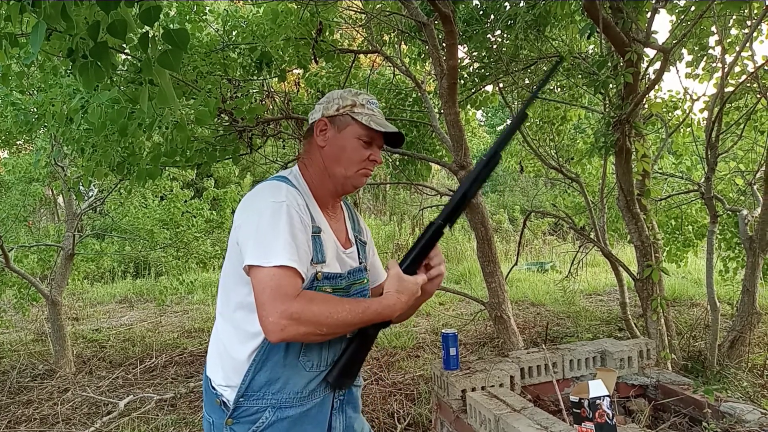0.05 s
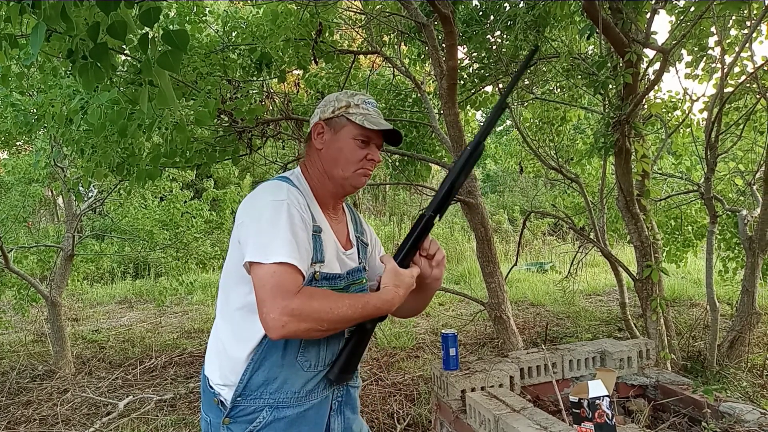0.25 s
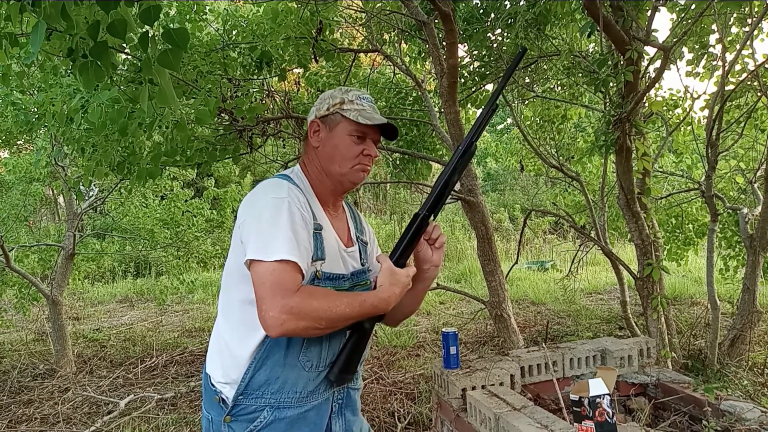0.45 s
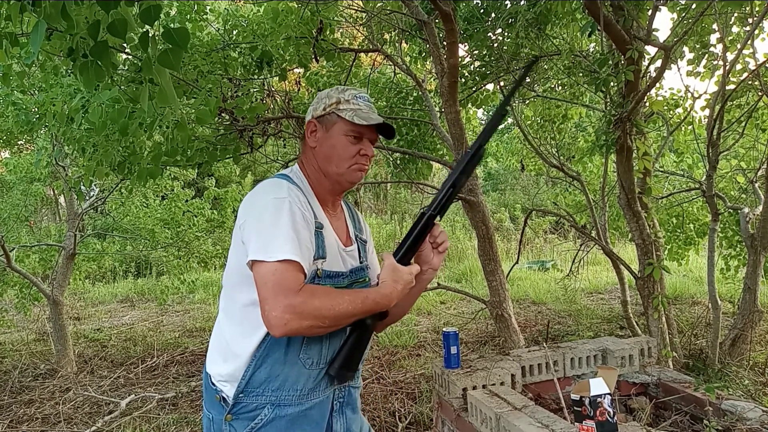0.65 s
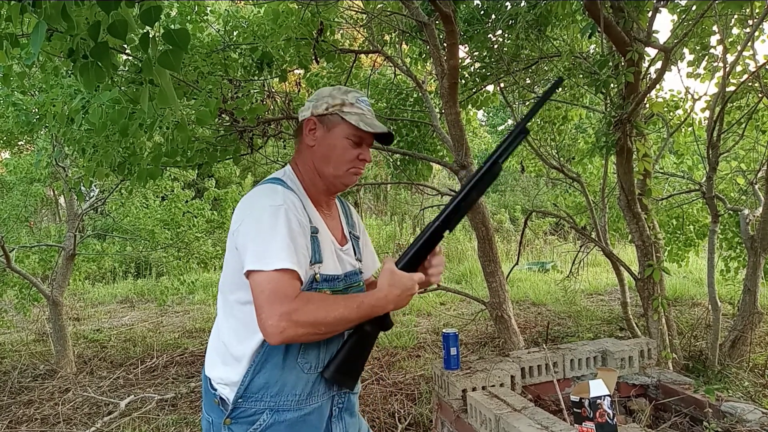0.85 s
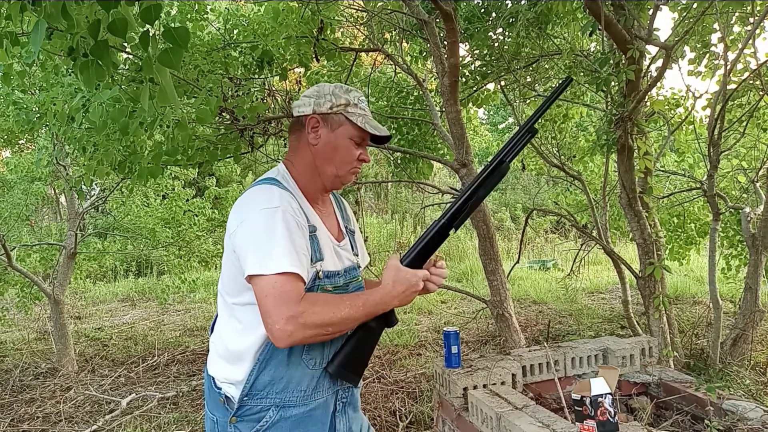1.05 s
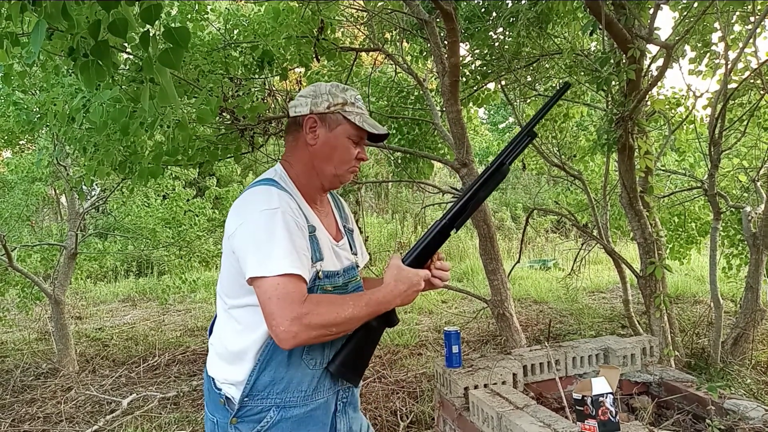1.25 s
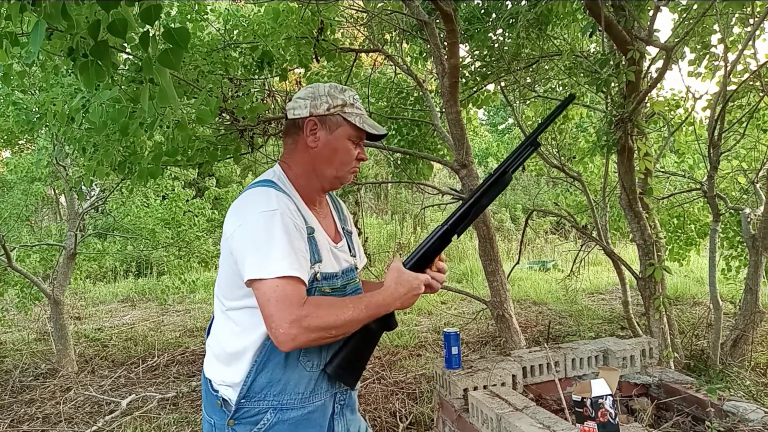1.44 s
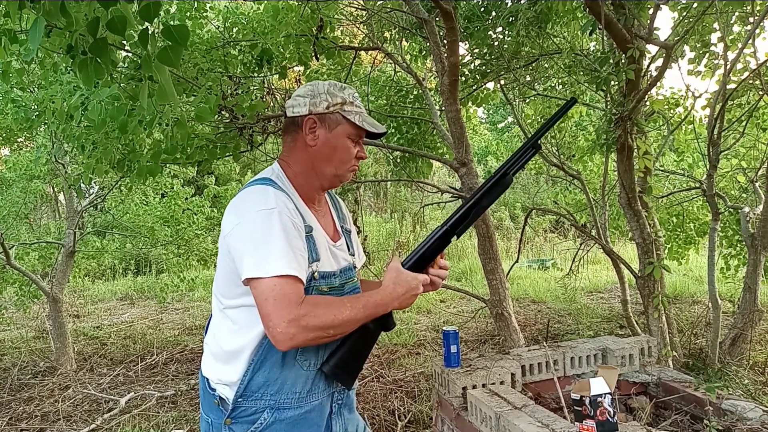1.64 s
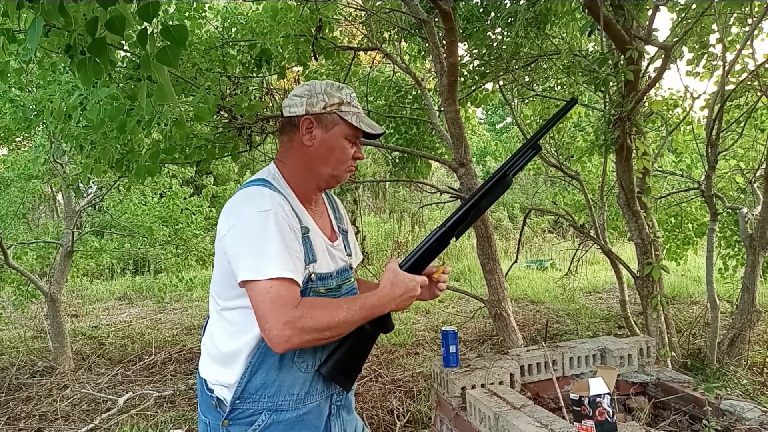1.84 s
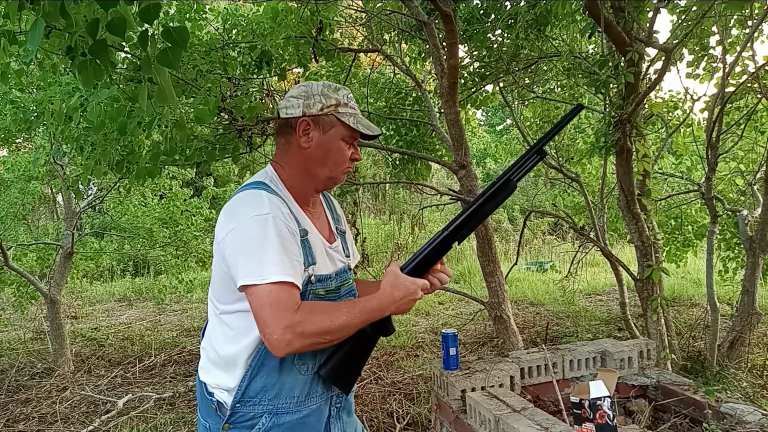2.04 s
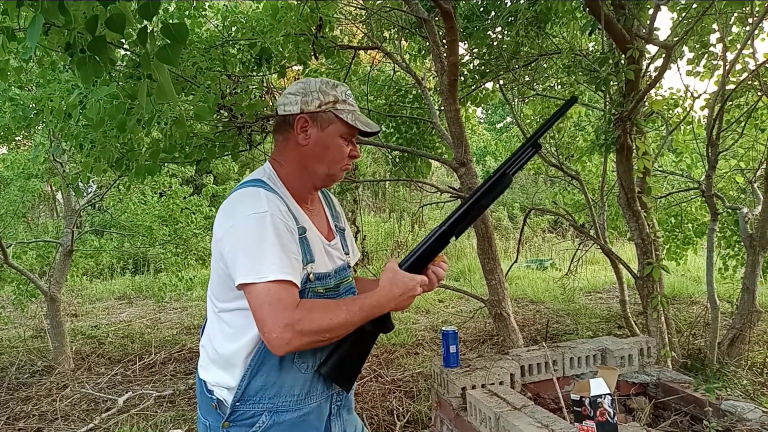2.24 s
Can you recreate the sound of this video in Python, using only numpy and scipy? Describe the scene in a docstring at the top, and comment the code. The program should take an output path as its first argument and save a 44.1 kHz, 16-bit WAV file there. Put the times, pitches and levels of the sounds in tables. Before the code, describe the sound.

A shotgun action is worked close by. The bolt scrapes back with quick metal clacks from about 0.2 to 0.4 seconds, then clacks shut at 0.6. A sharp snap comes at 1.1 seconds, a small click at 1.4 and another crisp click just after 1.5. Faint insects hiss steadily among the trees throughout, one of them chirping softly.

```python
"""Shotgun action among trees

The bolt scrapes back by stick-slip friction, hits its stop and clacks shut; each impact excites the
modes of receiver and stock. The trigger group snaps and a small catch clicks. Trunks and leaves scatter
each sound briefly. Insects hiss steadily and one chirps. The two microphones differ in frequency
response, and the gun's sound reaches the left one later."""
import sys
import numpy as np
from scipy import signal
from scipy.fft import rfft, irfft, next_fast_len
from scipy.io import wavfile
from scipy.ndimage import map_coordinates

SR = 44100
rng = np.random.default_rng(int(sys.argv[2]) if len(sys.argv) > 2 else 0)


def persist_wave(psi):
    """Save psi, clipped to +-1, as 16-bit WAV."""
    counts = np.round(np.clip(psi, -1, 1) * 32767).astype(np.int16)
    wavfile.write(sys.argv[1], SR, np.atleast_2d(counts).T)


N = 105840
T = np.arange(N) / SR
IMPACT_T = T[:SR // 4]

# Noise spectra of the air and two insect choruses: frequency_hz, density_db
AIR_SPECTRUM = [(25, -20.5), (45, -1), (58, 15.5), (80, 2), (118, 11), (160, 2), (400, -2.5), (1500, -3.5),
                (3500, -5), (6000, -7.5), (7200, -17.5), (10000, -12), (12000, -45)]
LOW_CHORUS = [(6500, -44.5), (7400, -15), (7900, 3), (8600, 3), (9000, -9.5), (10500, -20), (11000, -26.5),
              (12000, -58)]
HIGH_CHORUS = [(7500, -49.5), (8900, -20.5), (9300, 4.5), (9900, 2.5), (10500, -1), (10800, -14),
               (11400, -30.5), (13800, -52), (14800, -30), (15700, -37), (16300, -71.5)]
# Chirps of one insect: centre_s, level_db
CHIRPS = [(.11, -66.5), (.47, -64), (.95, -67.5), (1.109, -69.5), (1.27, -70.5), (1.43, -65),
          (1.625, -68.5), (1.762, -69), (1.925, -65), (2.09, -68.5), (2.261, -69)]
# Bolt impacts: start_s, level_db, crack_t60_s, tilt_db_per_octave, thump_db
BOLT_IMPACTS = [(.125, -46.5, 0.067, -3.5, -18), (.199, -53, 0.033, -2, 0), (0.2857, -23, 0.026, 0, -41),
                (0.3086, -24, 0.022, -11.5, -20.5), (0.3134, -15.5, 0.019, -5.5, -36),
                (0.3594, -15, .024, -1, -24), (0.557, -56, 0.018, -11, -11),
                (0.5855, -35.5, 0.08, 14.5, -52), (0.6005, -14, 0.043, 1, -16.5),
                (0.6354, -19, 0.037, 0, -36.5), (.679, -32.5, 0.025, 5, -35), (.86, -59, 0.25, 7.5, -25),
                (2.31, -53, .1, -6, -4.5)]
# Spectra of contact noise and rubbed steel: frequency_hz, density_db
BOLT_CRACK = [(100, -74.5), (250, -25.5), (400, -36.5), (620, -30), (950, -11), (1700, 4), (3100, -1.5),
              (4400, -4), (5400, 0.5), (7200, -6), (8500, -9.5), (10500, -4), (12500, -34.5),
              (14800, -15.5), (16300, -18.5)]
TRIGGER_CRACK = [(100, -54.5), (500, -36.5), (1000, -18), (1500, -8.5), (1900, -3), (3100, -1), (3900, -17),
                 (4600, -12.5), (5200, -1), (6400, -4), (7600, -13), (10000, -16.5), (13000, -41.5),
                 (15000, -29.5)]
FRICTION_SPECTRUM = [(60, -82), (170, -62), (400, -21.5), (600, -49), (850, -7), (1250, -30), (1700, 1.5),
                     (3100, -6), (4500, -16.5), (5400, 1), (7200, -15.5), (8500, 2.5), (10500, -7),
                     (13300, -25.5), (14800, 4.5), (15800, -3.5), (16500, -25)]
# Normal modes of the struck parts: pitch_hz, level_db, t60_s
RECEIVER_MODES = [(1030, -7, .09), (1600, -7, .05), (1950, -5, .05), (2900, 0, .05), (3620, 0, .06),
                  (4150, -7, .04), (4990, 0, .05), (5420, 3, .05), (5850, -6, .04), (6680, -5, .04),
                  (7170, -2, .05), (8100, -7, .04)]
STOCK_MODES = [(230, -0.5, 0.036), (345, -0.5, 0.055), (405.7, -1.5, 0.096)]
TRIGGER_MODES = [(1030, -26, .04), (1350, -23, .03), (1800, -12, .025), (2080, -8, .025), (2400, -6, .022),
                 (2760, -2, .025), (3060, 3, .024), (3330, -10, .025), (5030, -6, .025), (5350, -12, .022),
                 (5770, -7, .024), (6100, -12, .022), (6720, -19, .025), (8750, -30, .025)]
# Friction along the bolt's stroke: time_s, level_db
STROKE = [(.212, -51.5), (.223, -36), (.245, -21), (.265, -26), (.278, -20.5), (.298, -27.5), (.316, -17.5),
          (.326, -24.5), (.336, -11.5), (.344, -32), (.358, -73.5)]
# Resonances of the rubbed and rattled parts: centre_hz, bandwidth_hz, gain_db
RAIL_RESONANCES = [(1890, 130, -3), (3060, 110, 1), (3590, 90, -6), (5390, 120, 0), (5810, 90, -1),
                   (6050, 160, 0), (6640, 140, -1), (7210, 110, -2)]
CHATTER_RESONANCES = [(1560, 57, -4), (2080, 84, -11), (2506, 76, -1), (2990, 120, -1), (3453, 81, -7),
                      (5390, 190, -6), (6200, 157, -1), (7040, 130, 0.5)]
DRAG_RESONANCES = [(1000, 80, -8), (1350, 52, -9.5), (1820, 200, -10.5), (2200, 250, -1), (2890, 200, 2),
                   (5080, 200, -7), (5560, 200, -7)]
SPRING_RESONANCES = [(435, 58, -10), (998, 22, 1), (2170, 300, -7), (3530, 210, -4.5), (5100, 400, -5.5),
                     (6000, 500, -10), (7200, 130, -2.5)]
CATCH_RESONANCES = [(2367, 79, 8), (3200, 124, 5), (4090, 92, 8), (5810, 490, 4), (7000, 500, -35)]
# Light drags before a part moves: start_s, length_s, level_db
DRAGS = [(0.222, 0.03, -28), (0.5605, 0.041, -52.5), (1.506, 0.013, -53.5), (1.525, 0.013, -34.5),
         (1.54, 0.015, -42.5)]
# Hammer and trigger impacts: start_s, level_db, tilt_db_per_octave, crack_db, crack_t60_s
TRIGGER_IMPACTS = [(1.129, -14, -0.5, -13.5, .018), (1.1318, -25, -8.5, -7.5, .025),
                   (1.156, -43, -10, -15, .03), (1.183, -49.5, 0, -13, .03), (1.2207, -54, 2, -3.5, .03),
                   (1.5213, -39.5, 4, -30, 0.027), (1.548, -44.5, 6, 2.5, .03),
                   (1.5549, -21, 5.5, -5.5, 0.032)]
# Contacts of the catch: start_s, level_db, t60_s
CATCH_CONTACTS = [(1.41, -31, 0.048), (1.424, -41, 0.096), (1.441, -47.5, .05)]
# Reverberation among the trees: frequency_hz, t60_s
TREE_DECAY = [(200, .2), (1000, 0.25), (3000, 0.2), (7000, 0.2), (12000, 0.19)]
# Reflections from single trunks: delay_s, level_db
TRUNK_ECHOES = [(0.029, -27.5), (.054, -44), (.093, -46.5)]
# Loss at the right microphone as the gun turns away: time_s, gain_db
TURN_AWAY = [(.3, -1.5), (.62, -3), (1.13, -2.5), (1.41, -7.5), (1.55, -9)]
# Microphone responses: frequency_hz, gain_db
LEFT_MIC = [(200, -10), (7500, 1.5), (8700, -3.5), (10000, -33), (12000, -27), (14800, -23.5),
            (16000, -29.5)]
RIGHT_MIC = [(200, -12.5), (1200, -11), (2800, -15.5), (5000, -15), (7000, -9.5), (8200, -17), (9500, -7.5),
             (15000, -10.5)]


def amp(db):
    """Decibels to amplitude ratio."""
    return 10 ** (np.asarray(db) / 20)


def unit(x):
    """Normalisation to rms 1."""
    return x / np.sqrt(np.mean(x ** 2) + 1e-20)


def onset_unit(x):
    """Normalisation to rms 1 over the first three milliseconds."""
    return x / np.sqrt(np.mean(x[:132] ** 2) + 1e-20)


def along(points, hz):
    """Interpolation on a logarithmic frequency axis."""
    point_hz, values = np.transpose(points)
    return np.interp(np.log(hz + 1), np.log(point_hz + 1), values)


def filtered(x, response):
    """Linear filtering: the spectrum is multiplied by a frequency response."""
    size = x.shape[-1]
    padded = next_fast_len(size + SR // 4)
    return irfft(rfft(x, padded) * response(np.fft.rfftfreq(padded, 1 / SR)), padded)[..., :size]


def coloured(x, points, tilt_db=0, size=4096):
    """Minimum-phase filtering to a given spectrum, tilted per octave between 800 and 8000 Hz."""
    hz = np.fft.rfftfreq(size, 1 / SR)
    octaves = np.log2(np.clip(hz, 800, 8000) / 4000)
    cepstrum = irfft(np.log(amp(along(points, hz) + tilt_db * octaves)))
    cepstrum[1:size // 2] *= 2
    cepstrum[size // 2 + 1:] = 0
    return signal.fftconvolve(x, irfft(np.exp(rfft(cepstrum))))[:len(x)]


def bandpass(x, low_hz, high_hz):
    """Causal third-order band-pass filtering."""
    return signal.sosfilt(signal.butter(3, [low_hz, high_hz], "band", fs=SR, output="sos"), x)


def resonate(x, peaks):
    """Forced response of damped resonators in parallel."""
    return filtered(x, lambda f: sum(amp(db) * 1j * f * width / (hz * hz - f * f + 1j * f * width)
                                     for hz, width, db in peaks))


def fade(t60):
    """Exponential decay of sixty decibels in t60 seconds."""
    return amp(-60 * IMPACT_T / t60)


def burst(t60):
    """Exponentially decaying white noise."""
    return rng.standard_normal(len(IMPACT_T)) * fade(t60)


def ring(modes, tilt_db=0, spread_db=3):
    """Free vibration: a sum of damped modes whose strengths vary from blow to blow."""
    vibration = 0
    for hz, db, t60 in modes:
        gain = amp(db + tilt_db * np.log2(hz / modes[0][0]) + spread_db * rng.normal())
        vibration += gain * fade(t60) * rng.choice([-1, 1]) * np.sin(2 * np.pi * hz * IMPACT_T)
    return onset_unit(vibration)


def add(track, start_s, sound):
    """Superposition of a sound on the track."""
    part = track[round(start_s * SR):][:len(sound)]
    part += sound[:len(part)]


def impulses(per_s):
    """A random point process: unit impulses of either sign."""
    return (rng.random(N) < per_s / SR) * rng.choice([-1, 1], N)


def slips(per_s=3500, spread_db=4.5):
    """Stick-slip friction: dense impulses of uneven size."""
    return impulses(per_s) * amp(spread_db * rng.standard_normal(N))


def hiss(spectrum, flutter_db=0, flutter_per_s=60):
    """Shaped noise with optional random amplitude modulation."""
    flutter = map_coordinates(rng.standard_normal(1000), [T * flutter_per_s], mode="mirror")
    return unit(coloured(rng.standard_normal(N), spectrum) * amp(flutter_db * flutter))


def woodland():
    """Incoherent sources add: air, a low chorus mainly left, a high one right and one chirping insect."""
    chirps = insect_chirps()
    left = amp(-64.5) * hiss(AIR_SPECTRUM) + chirps + amp(-67.5) * hiss(LOW_CHORUS, flutter_db=1)
    right = coloured(amp(-62.5) * hiss(AIR_SPECTRUM) + chirps, RIGHT_MIC)
    right += amp(-60.5) * hiss(HIGH_CHORUS, flutter_db=1) + amp(-81.5) * hiss(LOW_CHORUS)
    return np.array([left, right])


def insect_chirps(pitch_hz=4410, half_width_hz=150, sigma_s=.024):
    """Amplitude modulation: bell-shaped pulses of narrow-band noise make an insect's soft chirps."""
    carrier = filtered(rng.standard_normal(N), lambda f: np.exp(-((f - pitch_hz) / half_width_hz) ** 2))
    envelope = sum(amp(db) * np.exp(-((T - centre_s) / sigma_s) ** 2 / 2) for centre_s, db in CHIRPS)
    return unit(carrier) * envelope


def bolt_impacts(crack_db=-3, receiver_db=-5.5):
    """Impact excitation: each contact cracks, rings the steel receiver and thumps the stock."""
    out = np.zeros(N)
    for start_s, db, t60, tilt_db, thump_db in BOLT_IMPACTS:
        crack = amp(crack_db) * onset_unit(coloured(burst(t60), BOLT_CRACK, tilt_db))
        steel = amp(receiver_db) * bandpass(ring(RECEIVER_MODES, tilt_db) * fade(3 * t60), 567, 9200)
        thump = amp(thump_db) * ring(STOCK_MODES)
        add(out, start_s, amp(db) * (crack + steel + thump))
    return out


def bolt_slide(stock_hz=406, stock_width_hz=65, hum_db=-28):
    """Sliding friction: the bolt scrapes and chatters, driving resonances of rails and hollow stock."""
    friction = slips()
    ticks = impulses(per_s=200)
    scrape = unit(coloured(friction, FRICTION_SPECTRUM))
    rails = amp(-4) * unit(bandpass(resonate(friction, RAIL_RESONANCES), 1200, 10000))
    chatter = amp(-3) * unit(bandpass(resonate(ticks, CHATTER_RESONANCES), 1700, 14000))
    effort = amp(np.interp(T, *np.transpose(STROKE), left=-120, right=-120))
    stock = [(stock_hz, stock_width_hz, 0)]
    hum = unit(resonate(resonate(friction * effort, stock), stock)) * np.sqrt(np.mean(effort ** 2))
    return unit(scrape + rails + chatter) * effort + amp(hum_db) * hum


def drags(edge_s=.009):
    """Light friction excites the parts' resonances as the hand takes up their slack."""
    envelope = np.zeros(N)
    for start_s, length_s, db in DRAGS:
        inside_s = np.minimum(T - start_s, start_s + length_s - T)
        envelope += amp(db) * np.clip(inside_s / edge_s + .5, 0, 1)
    return envelope * unit(bandpass(resonate(slips(), DRAG_RESONANCES), 860, 7500))


def magazine_tube(start_s=.243, release_s=.328, t60=.11, pitch_hz=1045, sag_hz_per_s=462, waver_hz=9):
    """One mode of the tube rings as the spring is squeezed, wavering and sinking slightly in pitch."""
    age_s = T - start_s
    envelope = np.clip(age_s / .0027, 0, 1) * amp(-60 * np.maximum(T - release_s, 0) / t60)
    waver = map_coordinates(rng.standard_normal(600), [T * 120], mode="mirror")
    hz = pitch_hz - sag_hz_per_s * np.clip(age_s, 0, .1) + waver_hz * waver
    level_db = -36.5 + 2 * np.roll(waver, SR)  # shifted, so level and pitch waver independently
    return amp(level_db) * envelope * np.sqrt(2) * np.sin(2 * np.pi * np.cumsum(hz) / SR)


def spring_shiver(peak_s=.403, rise_s=.005, t60=.053, level_db=-23.5):
    """Damped resonance: the spring shivers at the end of the stroke, swelling quickly and dying away."""
    age_s = T - peak_s
    envelope = np.exp(np.minimum(age_s, 0) / rise_s) * amp(-60 * np.maximum(age_s, 0) / t60)
    coils = unit(resonate(slips(), SPRING_RESONANCES))
    scrape = amp(-6) * unit(coloured(slips(), FRICTION_SPECTRUM, tilt_db=1))
    return amp(level_db) * envelope * (coils + scrape)


def spring_squeak(centre_s=.405, sigma_s=.0036, pitch_hz=3424, rise_hz_per_s=10000, level_db=-26):
    """Periodic stick-slip of steel gives a short rising tone and its second harmonic."""
    age_s = T - centre_s
    hz = pitch_hz + rise_hz_per_s * np.clip(age_s, -.02, .02)
    phase = 2 * np.pi * np.cumsum(hz) / SR
    envelope = np.exp(-(age_s / sigma_s) ** 2 / 2)
    return amp(level_db) * envelope * (np.sin(phase) + amp(-2) * np.sin(2 * phase))


def trigger_group():
    """Impact excitation: small steel parts snap home with a crack and high, quickly damped modes."""
    out = np.zeros(N)
    for start_s, db, tilt_db, crack_db, t60 in TRIGGER_IMPACTS:
        crack = amp(crack_db) * onset_unit(coloured(burst(t60), TRIGGER_CRACK, tilt_db))
        add(out, start_s, amp(db) * (ring(TRIGGER_MODES, tilt_db) + crack))
    return bandpass(out, 1200, 17000)


def catch():
    """Forced resonance: decaying contact noise drives a light catch as it clicks and drags."""
    out = np.zeros(N)
    for start_s, db, t60 in CATCH_CONTACTS:
        add(out, start_s, amp(db) * onset_unit(resonate(burst(t60), CATCH_RESONANCES)))
    return bandpass(out, 1600, 6240)


def scatter(x, near_db, trees_db=-15):
    """Scattering by the nearby ground and body, then by trunks and leaves, as an impulse response."""
    hz, time_s, spectra = signal.stft(rng.standard_normal(SR // 2), SR, nperseg=256)
    decay = amp(-60 * time_s / along(TREE_DECAY, hz)[:, None])
    _, tail = signal.istft(spectra * decay, SR, nperseg=256)
    response = amp(trees_db) * tail / np.linalg.norm(tail)
    near = burst(t60=.057)
    add(response, 0, amp(near_db) * near / np.linalg.norm(near))
    for delay_s, db in TRUNK_ECHOES:
        echo = burst(t60=.008)
        add(response, delay_s, amp(db) * echo / np.linalg.norm(echo))
    return signal.fftconvolve(x, response)[:N]


def at_microphones(x, lag_s=.00102):
    """Path difference delays the left side; the right, shaded from the gun, hears more close scatter."""
    left = np.pad(x, (round(lag_s * SR), 0))[:N]
    right = x * amp(np.interp(T, *np.transpose(TURN_AWAY)))
    return np.array([coloured(left + scatter(left, near_db=-19.5), LEFT_MIC),
                     coloured(right + scatter(right, near_db=-2.5), RIGHT_MIC)])


def scene():
    """Superposition of the gun's parts and the woodland at two microphones."""
    parts = [bolt_slide() + magazine_tube(), spring_shiver() + spring_squeak() + drags(),
             bolt_impacts(), trigger_group(), catch()]
    return sum(at_microphones(bandpass(part, 180, 17000)) for part in parts) + woodland()


def record(dry):
    """Band limiting: an ideal low-pass removes everything above 16.2 kHz."""
    return filtered(dry, lambda hz: hz < 16200)


dry = scene()
out = record(dry)
persist_wave(out)
```